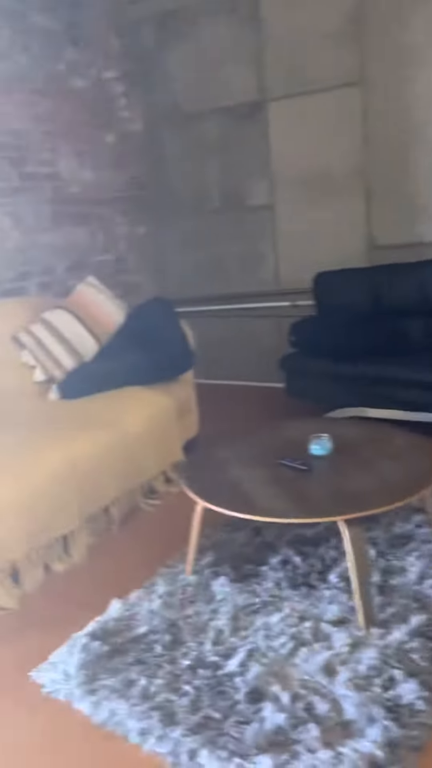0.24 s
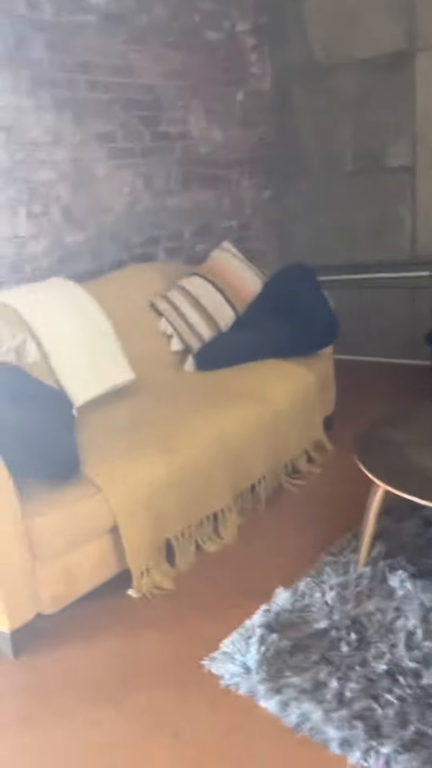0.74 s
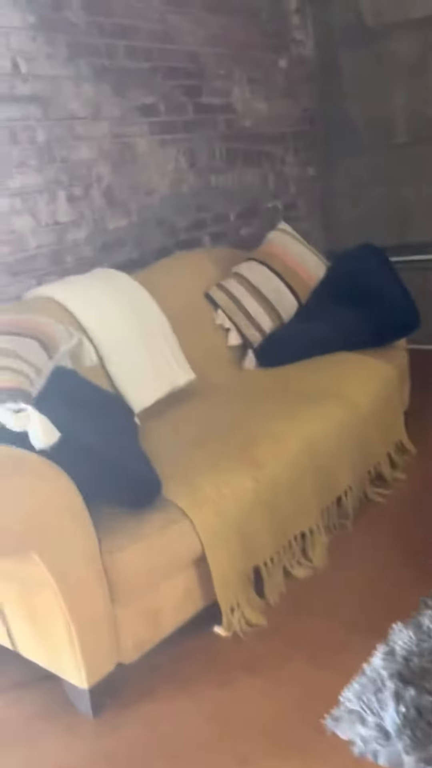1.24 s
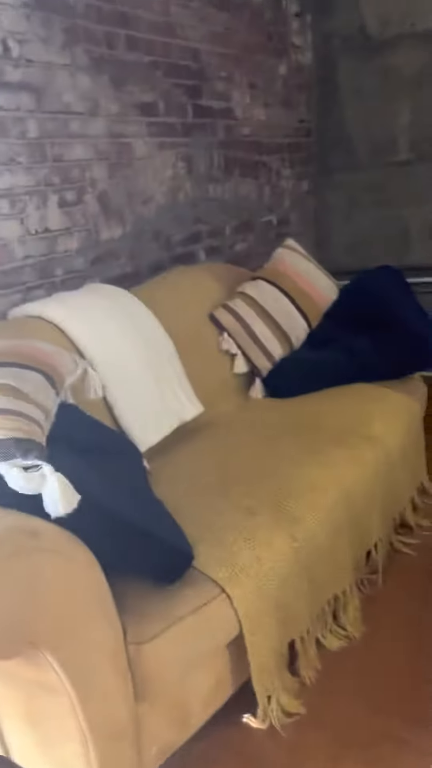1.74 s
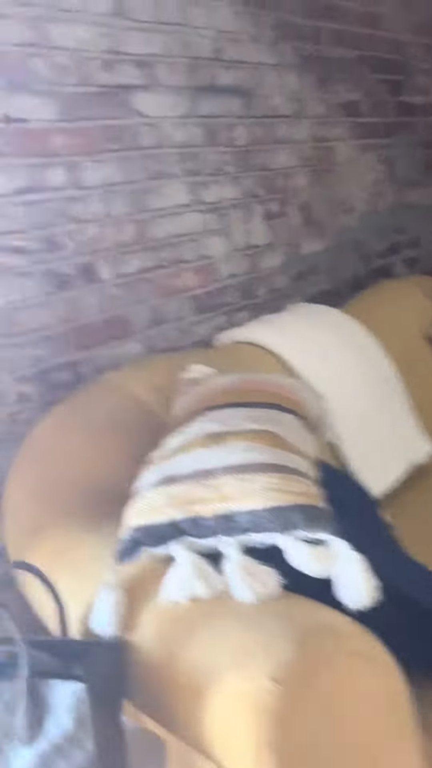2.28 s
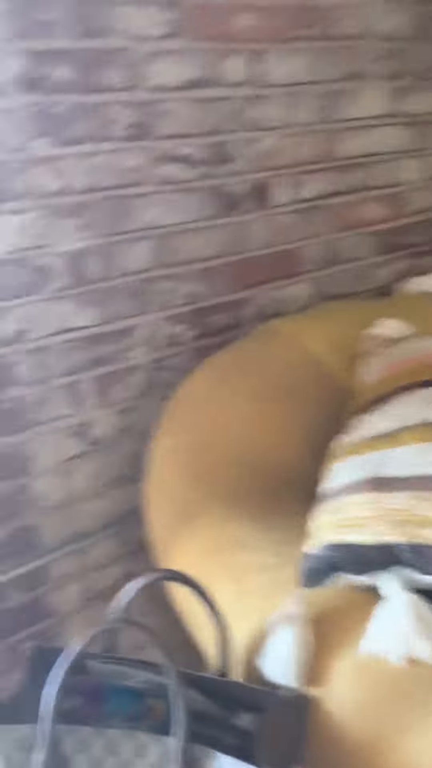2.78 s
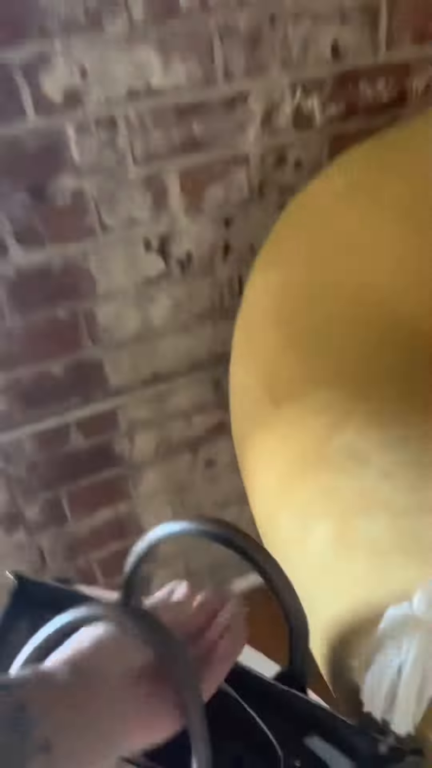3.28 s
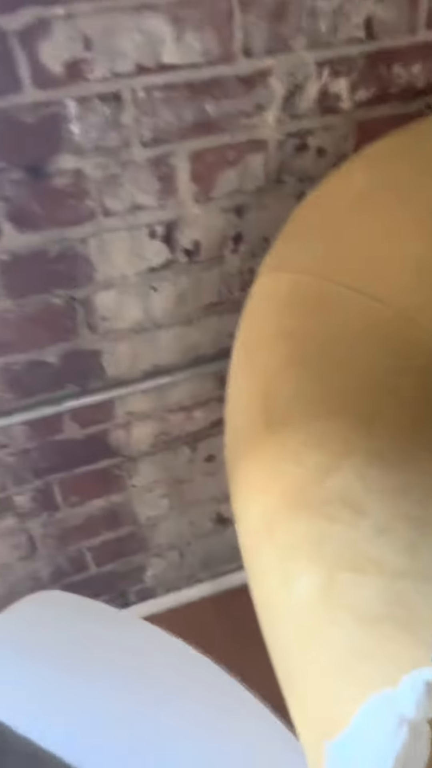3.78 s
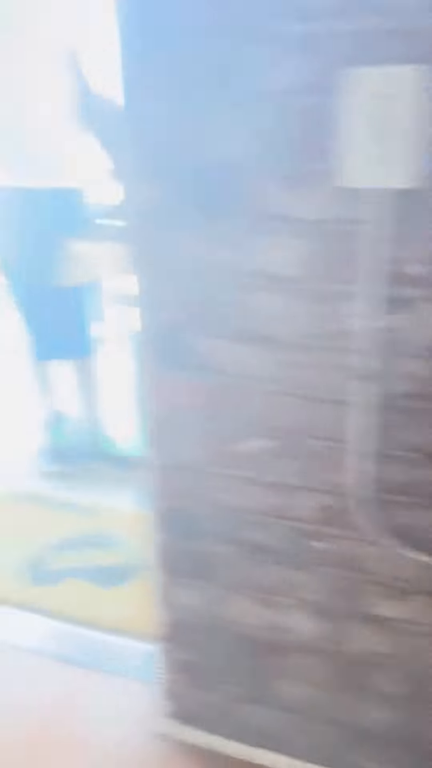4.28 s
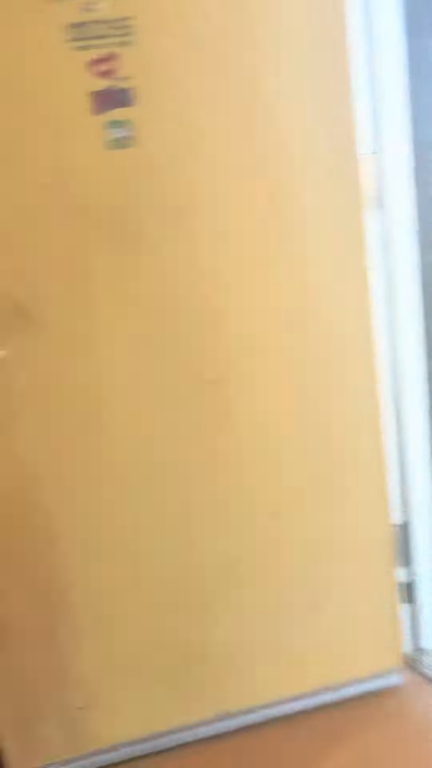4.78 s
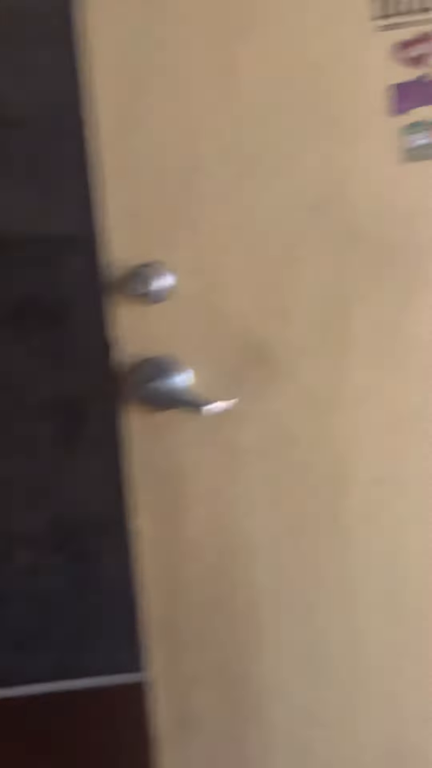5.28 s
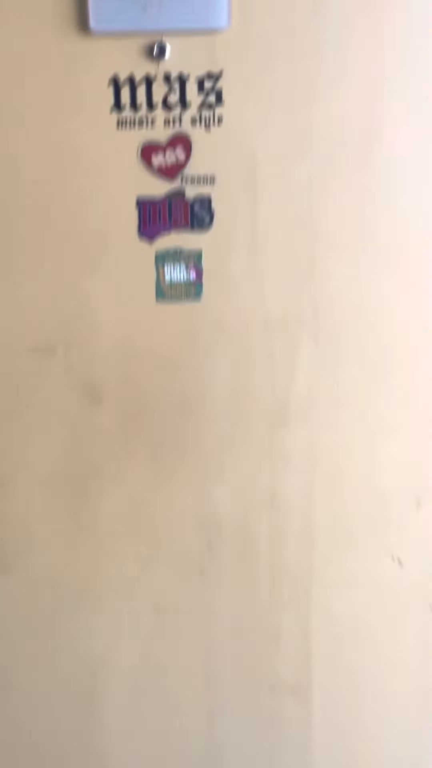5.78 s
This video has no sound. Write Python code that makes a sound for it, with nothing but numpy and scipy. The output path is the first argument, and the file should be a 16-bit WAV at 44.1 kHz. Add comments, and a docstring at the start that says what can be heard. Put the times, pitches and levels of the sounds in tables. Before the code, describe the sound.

Close handheld pickup of a person walking indoors on a wood floor. Muffled heel-and-ball thuds come at uneven intervals over faint hum and air. Cloth hisses and small buckles tick, then a hard double knock stands far above everything. Leather rubs and hollow taps cluster right after it, return about a second later with small clinks, a dull push shakes the microphone, and footsteps resume with light rustling.

```python
"""In a small humming room with a wooden floor, someone walks, phone in hand, and picks up a handbag.
Steps thud and boom in the boards: falling tones, board modes and noise bursts that die away.
Clothes and bag rub as streams of tiny grains; small hardware ticks and clinks in short high bursts.
Something hard clacks twice against the phone and rings its body; the bag also taps, squeaks and bumps.
Two hum tones and a wash of air, both wavering, lie behind it all as the walker turns to the door."""
import sys
import numpy as np
from scipy import signal
from scipy.fft import rfft, irfft
from scipy.io import wavfile

SR = 44100
rng = np.random.default_rng(int(sys.argv[2]) if len(sys.argv) > 2 else 0)


def int16_out(signal):
    """Quantize to a 16-bit WAV file."""
    q = np.round(np.clip(np.atleast_2d(signal).T, -1, 1) * 32767)
    wavfile.write(sys.argv[1], SR, q.astype(np.int16))


N = 266054
TIME = np.arange(N) / SR
RING = TIME[:SR * 3 // 4]  # time axis of one short sound, 0.75 s
PORT_DELAY = .00024  # seconds by which the right microphone port hears the treble later

# In all tables, a fade time is the time to die by 60 dB.
# In all spectra, only the differences between the dB values count: the sound is then set to rms 1.


def amp(db):
    """Decibels to gain."""
    return 10 ** (np.asarray(db) / 20)


def unit(x):
    """Scales each channel to rms 1."""
    return x / np.sqrt(np.mean(x ** 2, axis=-1, keepdims=True) + 1e-30)


def read(points, hz):
    """Reads a spectrum on a log-frequency axis."""
    f, value = np.transpose(points)
    return np.interp(np.log(hz + 1), np.log(f + 1), value)


def follow(rows):
    """Reads a curve at every sample, with straight lines between its points."""
    return np.interp(TIME, *np.transpose(rows))


def add(mix, s, sound):
    """Mixes a sound in at time s, cut off at the end of the scene."""
    start = max(round(s * SR), 0)
    part = mix[..., start:][..., :sound.shape[-1]]
    part += sound[..., :part.shape[-1]]


def colour(x, points):
    """Gives a signal a spectrum, at rms 1."""
    size = x.shape[-1]
    gain = amp(read(points, np.fft.rfftfreq(size, 1 / SR)))
    return unit(irfft(rfft(x) * gain, size))


def drift(rate_hz):
    """Slow random wandering: noise with nothing above rate_hz, at rms 1."""
    slow = np.fft.rfftfreq(N, 1 / SR) < rate_hz
    return unit(irfft(rfft(rng.standard_normal(N)) * slow, N))


def fade(t60):
    """Dies by 60 dB in t60 seconds."""
    return np.exp(-np.log(1000) * RING / t60)


def mode(hz, t60, cycles, lag=0):
    """A damped vibration that builds up over a given number of cycles, lag seconds late."""
    t = np.maximum(RING - lag, 0)
    build_up = 1 - np.exp(-(t * hz / cycles) ** 2)
    return np.sin(2 * np.pi * hz * t) * build_up * np.exp(-np.log(1000) * t / t60)


def sag(start_hz, end_hz, settle_s, t60, rise):
    """A damped vibration whose pitch falls and settles."""
    hz = end_hz + (start_hz - end_hz) * np.exp(-RING / settle_s)
    build_up = 1 - np.exp(-(RING / rise) ** 2)
    return np.sin(2 * np.pi * np.cumsum(hz) / SR) * fade(t60) * build_up


def burst(points, t60, rise):
    """Dense vibrations after a blow: fading noise, one draw for each port, of steady total energy."""
    shape = fade(t60) * (1 - np.exp(-RING / rise))
    noise = colour(rng.standard_normal((2, len(RING))), points)
    return unit(noise * shape) * np.sqrt(np.mean(shape ** 2))


def grains(per_s, spread_db):
    """Sparse clicks of either sign and unequal size, at the same moments in both ports."""
    size = amp(spread_db * np.minimum(rng.exponential(1, N), 4))
    happens = rng.random(N) < per_s / SR
    return size * happens * rng.choice([-1, 1], (2, N))


def room(x, t60, treble_t60):
    """Diffuse tail of a small room: fading noise, with its own fade time above about 3 kHz."""
    noise = rng.standard_normal((2, len(RING)))
    low = signal.sosfilt(signal.butter(2, 3000, fs=SR, output="sos"), noise)
    tail = low * fade(t60) + (noise - low) * fade(treble_t60)
    tail *= RING > .004  # the first reflections need 4 ms
    return signal.fftconvolve(x, unit(tail) / np.sqrt(len(RING)), axes=1)[:, :N]


# How alike the two microphone ports hear.
# Each row: frequency in Hz, likeness from 0 to 1.
PORT_LIKENESS = [(25, 1), (60, 1), (130, 0.99), (290, 0.93), (640, 0.34), (1400, 0.06), (3500, 0.16),
                 (5000, 1), (6500, 0.83), (15000, 1)]


def ports(x):
    """Both ports share the bass, differ in the middle, and share the treble with a short delay."""
    hz, (left, other) = np.fft.rfftfreq(N, 1 / SR), rfft(x)
    same = np.clip(read(PORT_LIKENESS, hz), 0, 1)
    right = same * left + np.sqrt(1 - same ** 2) * other
    delay = PORT_DELAY * np.clip(hz / 2000 - 1, 0, 1)  # sets in at 2 kHz, full from 4 kHz
    return irfft(np.array([left, right * np.exp(-2j * np.pi * hz * delay)]), N)


# Footfalls. Each row: start in seconds, then relative levels in dB of the boom of the boards,
# the slap of the sole, the click of the heel and the thud, then the thud's starting pitch in Hz.
FOOTFALLS = [(.372, -27.5, -37, -36.5, -25, 535), (0.976, -25.5, -41, -43, -28, 337),
             (1.124, -31.5, -47, -39, -37, 309), (1.772, -30.5, -39.5, -33, -33, 408),
             (1.936, -29, -43, -49, -26.5, 377), (2.795, -37, -43.5, -48, -29, 364),
             (3.752, -32.5, -46.5, -35.5, -37, 193), (3.94, -46, -71, -32, -37, 308),
             (5.043, -36.5, -56, -42, -36, 405), (5.213, -35.5, -46, -38, -37, 390),
             (5.805, -35, -46, -48, -33, 220), (5.859, -31, -42, -38, -30.5, 360)]
# Ringing floor boards. Each row: usual pitch in Hz, relative level in dB, fade time in seconds.
FLOOR_BOARDS = [(119, -41, .3), (138, 4.5, 0.49), (165.5, -2.5, 0.35), (224.2, -8, 0.82), (256, -7, 0.22),
                (272, -1.5, 0.088), (340, -32, 0.09)]
# Spectra of the boom as the room returns it, of the sole's slap and of the heel's click.
# Each row: frequency in Hz, level in dB per Hz.
BOOM_SPECTRUM = [(60, -5.5), (110, -3.5), (145, 7), (230, 5), (320, -20), (600, -70.5), (1500, -66)]
SLAP_SPECTRUM = [(120, -23), (280, 15), (450, 4), (650, -2), (1000, -12.5), (2000, -19), (4500, -31.5),
                 (7000, -73), (16000, -63)]
HEEL_SPECTRUM = [(150, -7), (350, 5.5), (560, 18.5), (900, -14), (2000, -14), (3000, -31.5), (15000, -45)]
# The ball of the foot lands after the heel: delay in s, level against the thud in dB, starting pitch in Hz.
BALL_S, BALL_DB, BALL_HZ = .043, -4.5, 266


def footsteps():
    """Heel and ball send falling thuds through the boards, which ring; the room carries boom and slap on."""
    direct, diffuse = np.zeros(N), np.zeros((2, N))
    for s, boom_db, slap_db, heel_db, thud_db, thud_hz in FOOTFALLS:
        thud = sag(thud_hz, end_hz=143.7, settle_s=0.0088, t60=0.11, rise=0.005)
        add(direct, s, amp(thud_db) * thud)
        ball = sag(BALL_HZ, end_hz=136.5, settle_s=0.0099, t60=.14, rise=0.0044)
        add(direct, s + BALL_S, amp(thud_db + BALL_DB) * ball)

        # the pitches differ a little from spot to spot; every other mode starts the opposite way
        spot = 1 + 0.029 * rng.standard_normal(len(FLOOR_BOARDS))
        boards = np.zeros(len(RING))
        for k, (hz, db, t60) in enumerate(FLOOR_BOARDS):
            boards += (-1) ** k * amp(db) * mode(hz * spot[k], t60, cycles=1.0)
        add(direct, s, amp(boom_db - 8) * boards)

        add(diffuse, s, amp(boom_db - 8.5) * burst(BOOM_SPECTRUM, t60=0.59, rise=0.0054))
        add(diffuse, s, amp(slap_db) * burst(SLAP_SPECTRUM, t60=0.42, rise=0.004))
        add(diffuse, s, amp(heel_db - 2.0) * burst(HEEL_SPECTRUM, t60=.035, rise=.0004))
    return direct + ports(diffuse)


# Hard knocks on the phone. Each row: start in seconds, level in dB,
# tilt of the crack in dB per octave, level in dB of the dull push behind the knock.
HARD_KNOCKS = [(3.2555, -.5, 0, -32), (3.2875, -13.5, -2.2, -31)]
# Phone body. Each row: pitch in Hz, relative level in dB, fade time in seconds,
# delay to the left port in seconds, delay to the right port in seconds.
PHONE_BODY = [(576, 6.5, .0092, .00044, .00038), (671, 4.5, .0205, .00142, .00098),
              (824, 9, .00745, .00152, .00102), (1093, 5.5, .0071, .00009, .00043)]
# Stiff high modes of the phone's body, excited at first contact. Each row: pitch in Hz,
# relative level in dB, fade time in seconds, extra delay at the right port in seconds.
STIFF_MODES = [(1270, -6, .008, .0002), (2030, -14, .009, .00014), (3200, -15, .006, .00015),
               (4920, -3.5, .0024, 0), (5380, -20.5, .006, .00012), (9270, -1, .0009, .00024),
               (12860, -12.5, .001, .00024)]


def clacks():
    """A hard blow rings the phone's body, each port at its own moment; it buzzes, and the rebound is duller."""
    buzz_spectrum = [(700, -19), (1850, 1), (2900, -22.5), (4500, -7.5), (7300, -9.5), (15000, -21.5)]
    lowest_hz = STIFF_MODES[0][0]
    out = np.zeros((2, N))
    for s, blow_db, dull_db, push_db in HARD_KNOCKS:
        body = np.zeros((2, len(RING)))
        for port in range(len(body)):
            for hz, db, t60, *delay in PHONE_BODY:
                body[port] += amp(db) * mode(hz, t60, cycles=1.45, lag=delay[port])
            for hz, db, t60, late in STIFF_MODES:
                level_db = db + dull_db * np.log2(hz / lowest_hz)
                body[port] += amp(level_db) * mode(hz, t60, cycles=1.64, lag=PORT_DELAY + port * late)
        buzz = burst(buzz_spectrum, t60=0.026, rise=0.00067)
        push = mode(250, t60=0.052, cycles=0.39)
        add(out, s, amp(blow_db) * (body + amp(-32.5) * buzz) + amp(push_db) * push)
    return out + amp(-30.5) * room(out, t60=0.4, treble_t60=0.078)


# Dull taps of the bag and the hand. Each row: start in seconds, level in dB, nominal pitch in Hz,
# fade time in seconds, level of the grit against the tone in dB.
DULL_TAPS = [(3.4891, -19, 825, .014, -6.5), (3.4969, -34, 1280, 0.011, -13.5),
             (3.501, -28, 584, 0.023, -23), (3.5109, -17, 497, 0.0076, -19),
             (3.5222, -32.5, 1080, 0.017, 1), (3.5246, -23, 308, 0.033, -16), (3.5502, -28, 1790, .008, -2),
             (3.5525, -24.5, 780, 0.022, -13), (3.5695, -17.5, 386, 0.01, -20.5),
             (3.573, -42, 2170, .014, 3), (3.5944, -27.5, 1560, 0.011, -7.5), (3.596, -30, 283, 0.038, -11),
             (3.665, -40, 663, .026, -6), (3.868, -34, 616, 0.024, -4), (3.945, -34.5, 640, 0.04, -9),
             (4.028, -40.5, 890, 0.019, -6), (4.05, -37.5, 653, 0.032, -2.5), (4.09, -26, 553, 0.0066, -8),
             (4.3043, -31, 1620, 0.016, -7), (4.3214, -29.5, 1010, 0.024, -6), (4.345, -30, 480, 0.022, -6),
             (4.354, -33, 620, 0.022, 0.5), (4.359, -27.5, 620, 0.053, -4.5), (4.397, -34, 900, 0.015, 1),
             (4.406, -26.5, 307, 0.035, -12.5), (4.423, -33, 348, 0.045, -22),
             (4.4567, -30, 390, 0.032, -12), (4.526, -38.5, 1240, 0.042, -5.5),
             (4.536, -25.5, 410, 0.015, -9), (4.566, -43, 770, 0.043, -1), (4.636, -33.5, 2070, 0.013, -9),
             (4.662, -38, 684, 0.06, 1), (4.797, -47, 1520, 0.029, -2.5), (5.213, -44, 770, 0.015, -7),
             (5.255, -32.5, 1070, 0.015, -11), (5.873, -35, 780, 0.017, -20)]
TAP_LEFT_DB = 3  # how much louder taps are at the left port
TAP_START, TAP_END = 1.38, 0.799  # the pitch sags as the leather gives, in multiples of the nominal pitch


def taps():
    """Damped knocks of leather and fingers: a short hollow tone that sags in pitch, and a gritty puff."""
    puffs, tones = np.zeros((2, N)), np.zeros(N)
    for s, db, hz, t60, grit_db in DULL_TAPS:
        grit = [(100, -20), (hz * 0.5, -4), (hz * 1.1, 0), (hz * 2.1, -11), (15000, -37)]
        add(puffs, s, amp(db + grit_db) * burst(grit, t60, rise=0.0003))
        tone = sag(hz * TAP_START, hz * TAP_END, settle_s=1.28 / hz, t60=t60, rise=.5 / hz)
        add(tones, s, amp(db) * tone)
    tail = amp(-12) * room(puffs + tones, t60=0.11, treble_t60=0.25)
    balance = amp([[TAP_LEFT_DB / 2], [-TAP_LEFT_DB / 2]])
    return (tones + ports(puffs + tail)) * balance


# Movements that rub clothes and bag. Each row: moment of full speed in seconds, build-up in seconds,
# hold in seconds, fade time in seconds, then relative levels in dB of cloth hiss, sleeve swish and
# leather scrape.
MOVEMENTS = [(0.588, 0.28, 0.16, 0.37, -82, -65.5, -67), (1.016, .04, 1.39, 0.63, -73, -68, -72.5),
             (1.625, .012, 0.19, 0.5, -65.5, -81, -83), (2.49, 0.14, 0.012, 0.62, -72.5, -69, -58),
             (2.871, 0.19, 0.022, 2.4, -63.5, -60, -76), (3.29, 0.022, 0.37, 0.9, -70.5, -78, -58),
             (3.506, 0.059, 0.019, 0.13, -57, -43, -42), (3.549, 0.011, 0.015, 0.26, -64, -45, -40),
             (3.63, 0.059, 0.02, 0.49, -74, -52.5, -57), (4.032, 0.039, 0.75, 0.56, -64.5, -69, -56.5),
             (3.951, 0.02, 0.018, 0.45, -67.5, -72, -57), (4.337, 0.1, 0.089, 0.32, -53, -48, -41.5),
             (4.527, 0.014, 0.01, 0.22, -71, -60, -44.5), (4.646, 0.15, 0.23, 0.36, -86, -60.5, -59.5),
             (5.24, 0.067, 0.022, 0.73, -81, -51, -48), (5.21, 0.2, 0.41, 5.1, -74.5, -58, -65.5),
             (5.88, 0.057, 0.027, 3.3, -68.5, -56, -54.5)]


def motion(axis):
    """Gain of cloth (0), sleeve (1) or leather (2): each movement builds up, holds its speed and dies away."""
    power = np.zeros(N)
    for s, build, hold, t60, *levels_db in MOVEMENTS:
        attack = np.clip(1 + (TIME - s) / build, 0, 1) ** 2
        release = np.exp(-np.log(1000) * np.maximum(TIME - s - hold, 0) / t60)
        power += (amp(levels_db[axis]) * attack * release) ** 2
    return np.sqrt(power)


# Spectra of the cloth's hiss, the sleeve's swish and the leather's scrape.
# Each row: frequency in Hz, level in dB per Hz.
CLOTH_SPECTRUM = [(500, -20), (1500, -29.5), (2800, 5.5), (4500, 3.5), (6200, 3.5), (8000, 3),
                  (10500, -5.5), (13500, -2), (15000, -2)]
SLEEVE_SPECTRUM = [(400, 4), (1200, -7), (2000, 5), (2700, -6), (3700, -3.5), (4600, -11), (6300, -16.5),
                   (15000, -56)]
LEATHER_SPECTRUM = [(100, -9), (280, 8.5), (550, -1), (900, -2.5), (1500, -11), (2300, -18), (3500, -48),
                    (6000, -29.5), (15000, -45)]


def rubbing():
    """Cloth fibres hiss in fine grains, sleeves swish; leather sticks and slips, louder at the left port."""
    cloth = colour(grains(per_s=14000, spread_db=4.0), CLOTH_SPECTRUM)
    cloth *= motion(axis=0) * amp(3.25 * drift(rate_hz=16))
    swish = colour(grains(per_s=2500, spread_db=3), SLEEVE_SPECTRUM)
    swish *= motion(axis=1) * amp(-5.0 + 1.94 * drift(rate_hz=29))
    slips = colour(grains(per_s=420, spread_db=1.6), LEATHER_SPECTRUM)
    slips *= motion(axis=2) * amp(1.0 + 1.3 * drift(rate_hz=61))
    return ports(cloth + swish + slips * amp([[2.5], [-2.5]]))


# A hand's quick brushes over fabric. Each row: start in seconds, level in dB, fade time in seconds.
HAND_BRUSHES = [(0.988, -57.5, 0.38), (2.753, -56.5, 0.47), (2.861, -50.5, 0.27), (4.666, -56, 0.53)]


def brushes():
    """Fabric slides over fabric: hiss that swells quickly and dies away."""
    out = np.zeros((2, N))
    for s, db, t60 in HAND_BRUSHES:
        add(out, s, amp(db) * burst(CLOTH_SPECTRUM, t60, rise=0.025))
    return ports(out)


# Gritty squeaks of soles, straps and boards.
# Each row: start in seconds, level in dB, pitch in Hz, fade time in seconds.
GRITTY_SQUEAKS = [(1.742, -53.5, 2950, 0.075), (2.459, -56, 428, 0.29), (2.5, -50.5, 440, .11),
                  (3.647, -50.5, 2600, .07), (3.679, -53, 2830, 0.068), (4.355, -37, 2340, .025),
                  (4.529, -50.5, 1940, 0.07), (5.255, -42, 1950, 0.075), (5.873, -43, 2120, 0.04),
                  (5.924, -51.5, 2340, .04)]
# Their band. Each row: multiple of the pitch, level in dB per Hz.
SQUEAK_SPECTRUM = [(.4, -30), (.7, -8), (1, 0), (1.3, -12), (3, -35)]
# Small crinkles of the creasing leather: level in dB against the scrape's and the swish's motion.
CRINKLE_LEATHER_DB, CRINKLE_SWISH_DB = -29.5, -15.5


def squeaks():
    """Short stick-slips around one pitch: a few strong ones, and many small crinkles as the bag moves."""
    out = np.zeros((2, N))
    for s, db, hz, t60 in GRITTY_SQUEAKS:
        band = np.array(SQUEAK_SPECTRUM) * [hz, 1]
        add(out, s, amp(db) * burst(band, t60, rise=0.00043))
    crinkles = np.zeros((2, N))
    for hz in np.geomspace(1150, 3600, num=14):
        ring = mode(hz, t60=.012, cycles=1)
        crinkles += signal.oaconvolve(grains(per_s=44, spread_db=5.5), ring[None], axes=1)[:, :N]
    creasing = amp(CRINKLE_LEATHER_DB) * motion(axis=2) + amp(CRINKLE_SWISH_DB) * motion(axis=1)
    return ports(out + unit(crinkles) * creasing)


# Soft bumps that shake the phone.
# Each row: start in seconds, level in dB, pitch in Hz, fade time in seconds.
SOFT_BUMPS = [(4.601, -16, 71, 0.061), (4.662, -36, 63, 0.83), (4.696, -5, 84, 0.033),
              (4.719, -35, 131.7, 0.47), (4.871, -22, 84, 0.052), (5.052, -28, 78, 0.076)]


def bumps():
    """Soft pushes on the phone: slow cycles that die away."""
    out = np.zeros(N)
    for s, db, hz, t60 in SOFT_BUMPS:
        add(out, s, amp(db) * mode(hz, t60, cycles=0.53))
    return out


# Sharp ticks of buckles and zip. Each row: start in seconds, level in dB, pitch in Hz.
HARDWARE_TICKS = [(1.2263, -48, 7660), (1.3144, -40.5, 7820), (1.4108, -44, 6460), (1.4907, -48.5, 5870),
                  (1.5581, -52, 6500), (1.6107, -36, 4900), (1.7207, -50, 5500), (1.8556, -40.5, 4930),
                  (1.9608, -41.5, 4800), (2.0352, -45.5, 5500), (2.0894, -53, 7570), (2.1368, -50, 7600),
                  (2.1971, -55.5, 6550), (2.2246, -54, 5000), (2.266, -58, 6000), (2.2994, -51, 6000),
                  (2.4012, -59, 9000), (2.8716, -31, 3630), (2.999, -35, 4900), (3.027, -43.5, 4720),
                  (3.2134, -44.5, 5070), (3.4893, -44, 4800), (3.4947, -31, 6000), (3.5517, -26.5, 3620),
                  (3.9343, -27, 7200), (4.0429, -31, 3540), (4.1135, -34, 4970), (4.3418, -29, 4930),
                  (4.6454, -37.5, 4100), (4.6608, -29.5, 4640), (4.7166, -35.5, 12700),
                  (4.853, -40.5, 8600), (5.1753, -45.5, 3260), (5.3606, -44, 4440), (5.938, -40.5, 5500)]
# Brighter snaps. Each row: start in seconds, level in dB, fade time in seconds.
BRIGHT_SNAPS = [(1.61, -47.5, 0.063), (3.349, -31.5, 0.012), (4.663, -31, 0.048)]


def ticks():
    """Tiny hard contacts, each a few milliseconds of treble, and snaps; the room rings on after both."""
    snap_spectrum = [(250, -22), (800, -16), (2600, -14), (3500, -8.0), (4500, 1.0), (6200, -3.5),
                     (8000, -2.0), (11000, -14.5), (16000, -8.0)]
    out = np.zeros((2, N))
    for s, db, hz in HARDWARE_TICKS:
        tone = [(1000, -26), (hz * .4, -15), (hz * .7, -2), (hz * 1.1, 0), (hz * 2.1, -9), (hz * 5, -26)]
        add(out, s, amp(db) * burst(tone, t60=.0065, rise=.0003))
    for s, db, t60 in BRIGHT_SNAPS:
        add(out, s, amp(db) * burst(snap_spectrum, t60, rise=0.00024))
    return ports(out + amp(-12.5) * room(out, t60=0.35, treble_t60=0.18))


# Small metal parts chime. Each row: start in seconds, level in dB, pitch in Hz,
# fade time of the after-ring in seconds, factor that spreads the cluster of modes.
METAL_CLINKS = [(0.649, -63.5, 10630, 0.54, 1), (3.001, -57, 10600, .6, 1), (3.352, -27, 10660, 0.3, 0.92),
                (4.297, -34.5, 9460, .08, 3), (4.429, -33.5, 9650, .07, 3.4)]
# Their cluster of close modes. Each row: distance from the pitch in Hz before spreading, level in dB per Hz.
METAL_CLUSTER = [(-1300, -49), (-400, -16), (-110, -10.5), (128, 2.5), (380.5, -27), (1690, -41)]


def clinks():
    """Small metal rings: a bright ping of close high modes, a faint shimmer and one mode that sings on."""
    out = np.zeros((2, N))
    for s, db, hz, t60, spread in METAL_CLINKS:
        cluster = np.array(METAL_CLUSTER) * [spread, 1] + [hz, 0]
        ping = burst(cluster, t60=0.036, rise=0.00029)
        shimmer = amp(-29.5) * burst(cluster, t60, rise=0.003)
        add(out, s, amp(db) * (ping + shimmer))
        add(out, s, amp(db - 22.5) * mode(hz + 100, t60, cycles=2.3))
    return ports(out)


# Pitches of the lower and the upper hum tone, in Hz.
HUM_PITCHES = [59.2, 99.5]
# Loudness of the lower and of the upper hum tone along the walk.
# Each row: time in seconds, relative level in dB.
LOW_HUM_LEVEL = [(0, -51.5), (.4, -45), (.85, -66), (1.25, -52), (2.549, -67.5), (3.05, -51.5), (4.35, -57),
                 (5.5, -43), (6.03, -47.5)]
HIGH_HUM_LEVEL = [(0, -60.5), (1.35, -47), (2.25, -56), (3.3, -38), (3.75, -38.5), (5.1, -52.5),
                  (6.03, -45)]
# Spectrum of the room air. Each row: frequency in Hz, level in dB per Hz.
AIR_SPECTRUM = [(20, -19), (45, -3.5), (75, 3), (130, -2.5), (180, -9.5), (300, -14.5), (500, -17.5),
                (1000, -22), (1600, -33.5), (2800, -49), (6000, -54.5), (15000, -65.5)]


def background():
    """Ventilation: two wavering hum tones, louder in some places of the room, over a low wash of air."""
    hum = np.zeros(N)
    for hz, level in zip(HUM_PITCHES, (LOW_HUM_LEVEL, HIGH_HUM_LEVEL)):
        gain = amp(follow(level) + 2.0 + 1.4 * drift(rate_hz=6))
        hum += gain * np.sin(2 * np.pi * hz * TIME + 0.6 * drift(rate_hz=1.6))
    near_door_db = np.interp(TIME, [0, 1.2, 2.5, 4.3, 5.1, 6], [-2.5, 0.0, 0.5, 1.5, 5.0, 2.5])
    waver_db = 1.1 * drift(rate_hz=10)
    air = colour(rng.standard_normal((2, N)), AIR_SPECTRUM) * amp(-49 + near_door_db + waver_db)
    return hum + ports(air)


def scene():
    """All sources at the two ports."""
    handling = clacks() + taps() + rubbing() + brushes() + squeaks() + bumps()
    hardware = ticks() + clinks()
    return footsteps() + handling + hardware + background()


def record(dry):
    """The microphones dip a little near 10 kHz and roll off at the top; then full-scale and band limits."""
    response = [(7000, 0.5), (9700, -2), (11500, 1), (13700, -4.0), (15000, -14.0)]  # Hz, dB
    heard = irfft(rfft(dry) * amp(read(response, np.fft.rfftfreq(N, 1 / SR))), N)
    band_limit = signal.firwin(511, 16300, window=("kaiser", 9), fs=SR)  # passes below 16.3 kHz
    return signal.oaconvolve(np.clip(heard, -1, 1), band_limit[None], "same")


dry = scene()
out = record(dry)
int16_out(out)
```